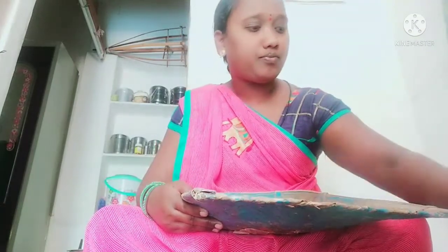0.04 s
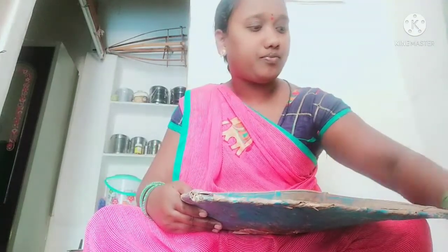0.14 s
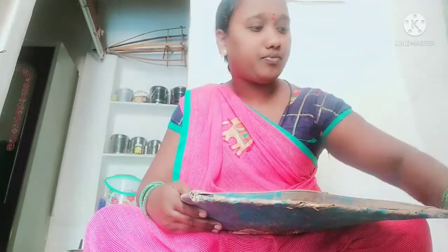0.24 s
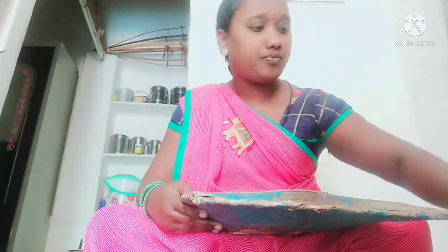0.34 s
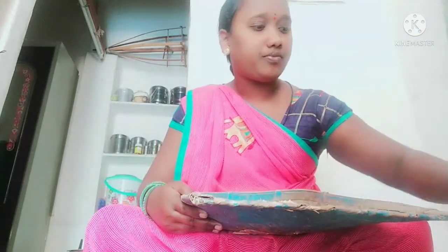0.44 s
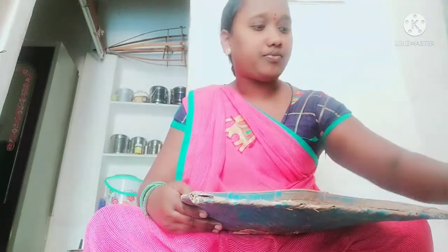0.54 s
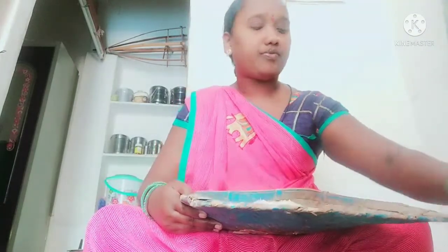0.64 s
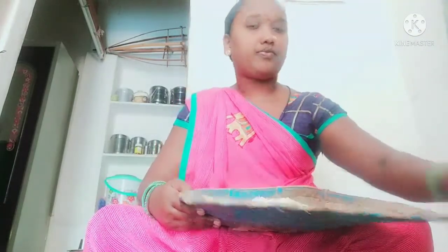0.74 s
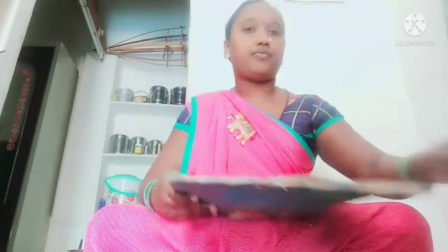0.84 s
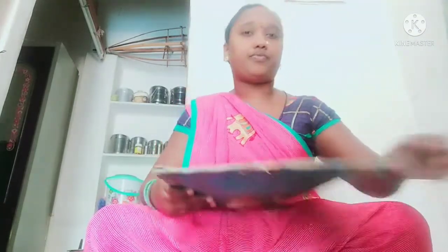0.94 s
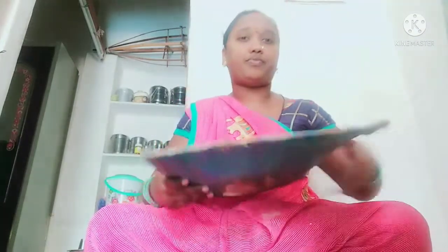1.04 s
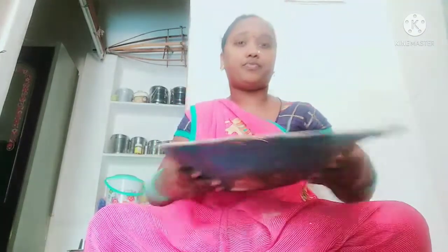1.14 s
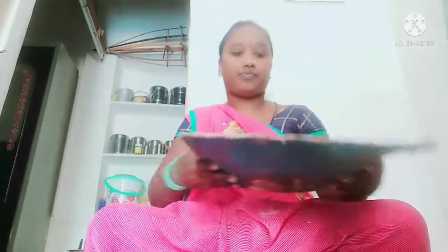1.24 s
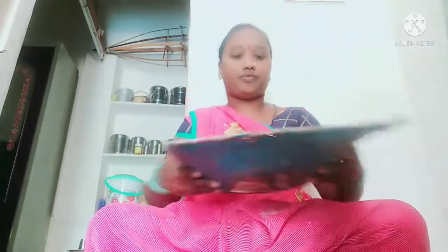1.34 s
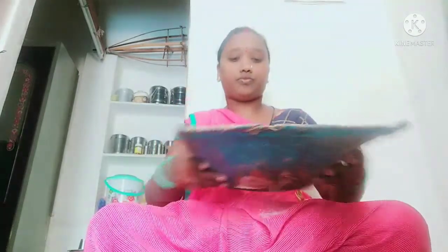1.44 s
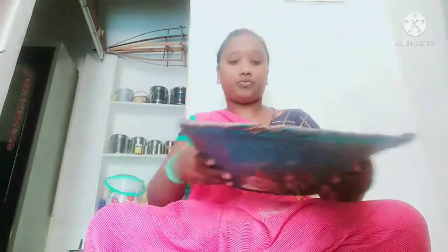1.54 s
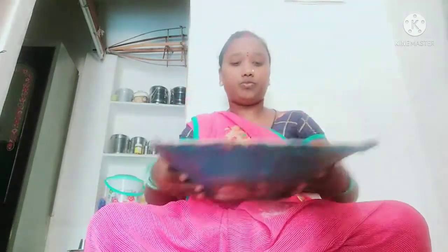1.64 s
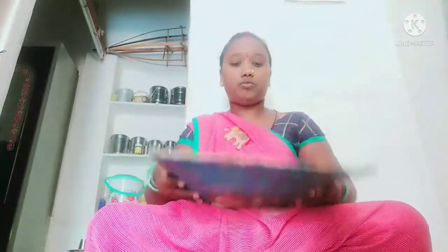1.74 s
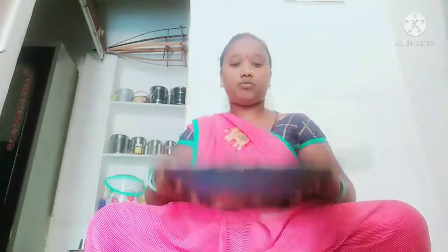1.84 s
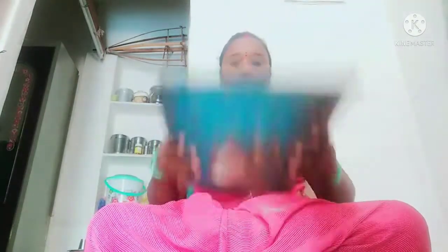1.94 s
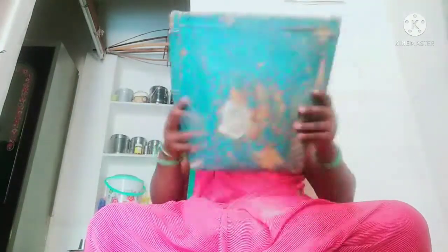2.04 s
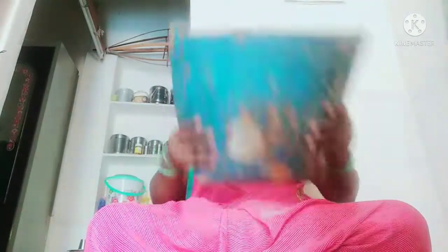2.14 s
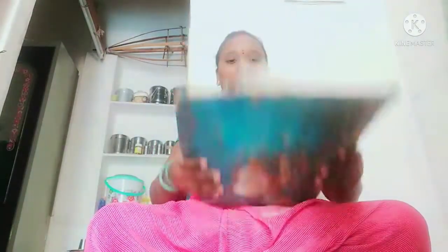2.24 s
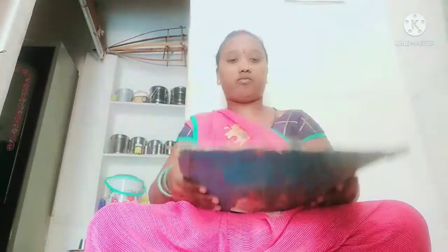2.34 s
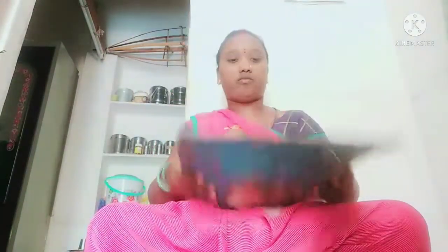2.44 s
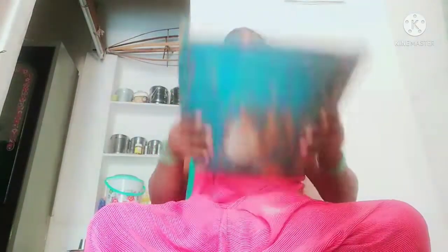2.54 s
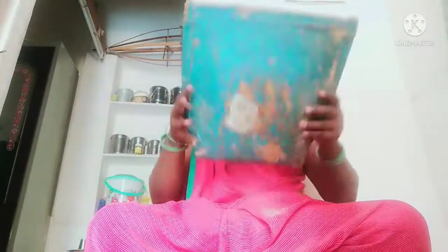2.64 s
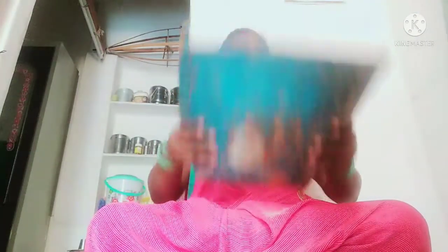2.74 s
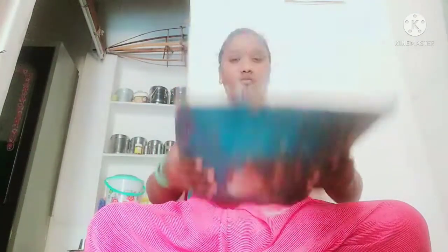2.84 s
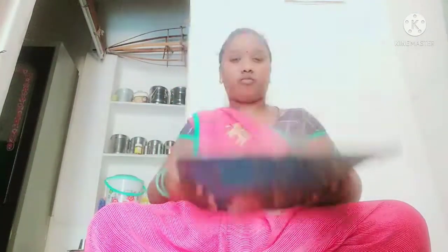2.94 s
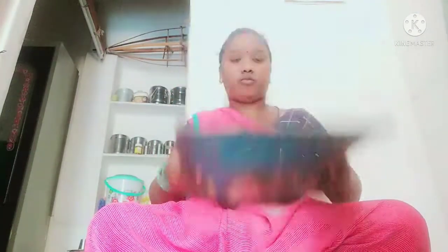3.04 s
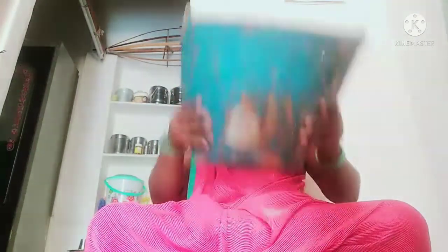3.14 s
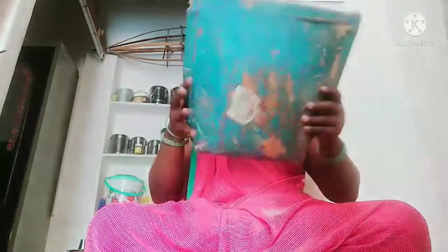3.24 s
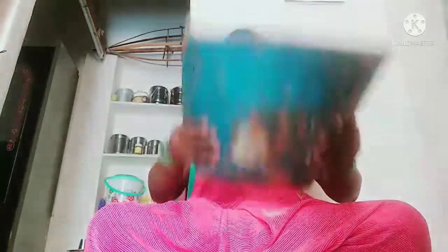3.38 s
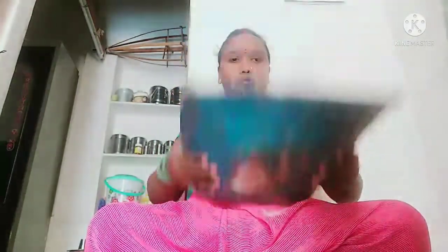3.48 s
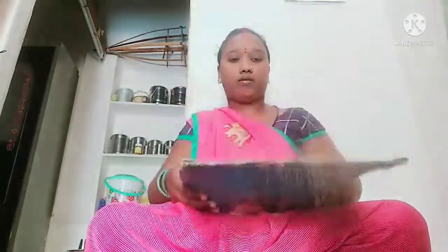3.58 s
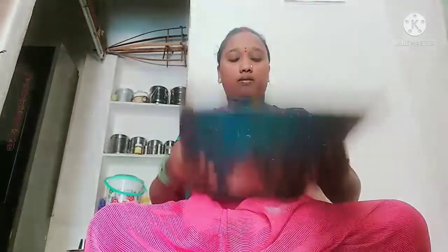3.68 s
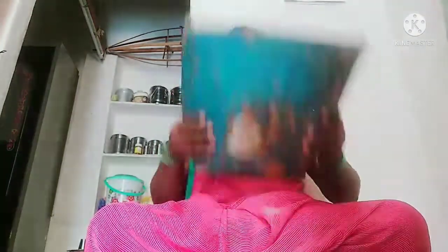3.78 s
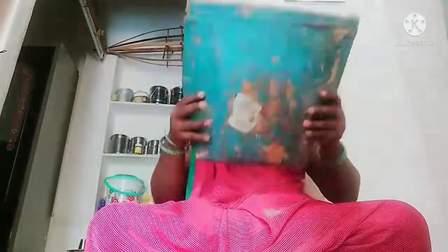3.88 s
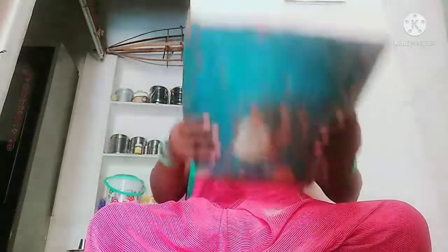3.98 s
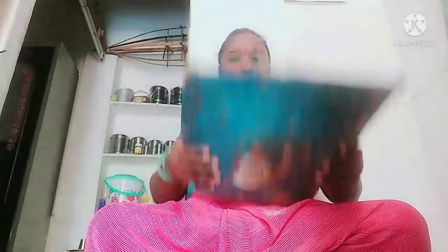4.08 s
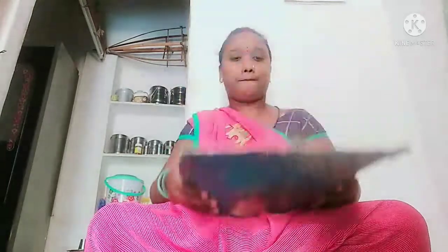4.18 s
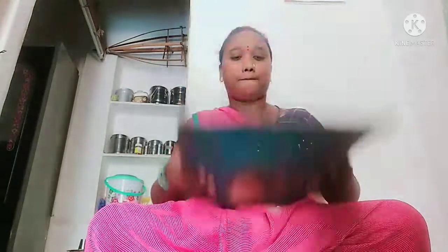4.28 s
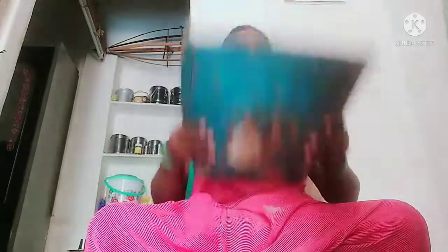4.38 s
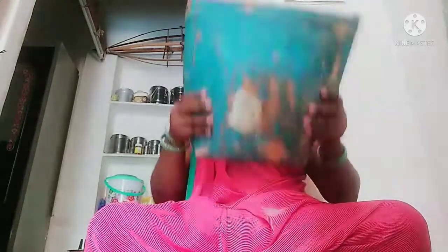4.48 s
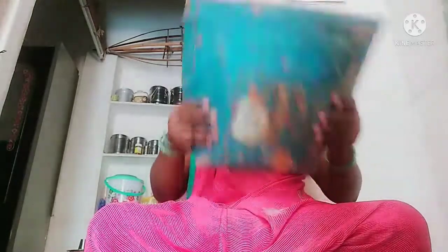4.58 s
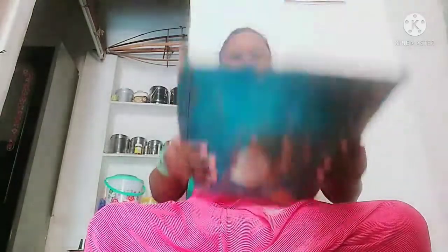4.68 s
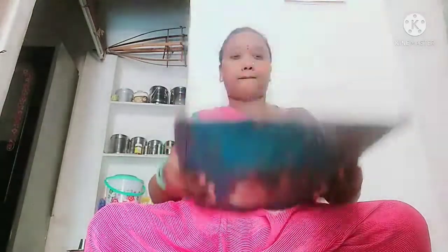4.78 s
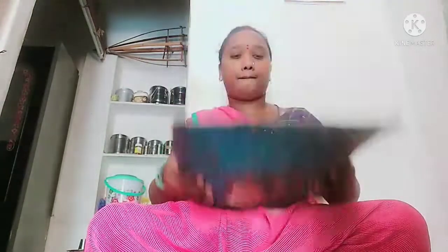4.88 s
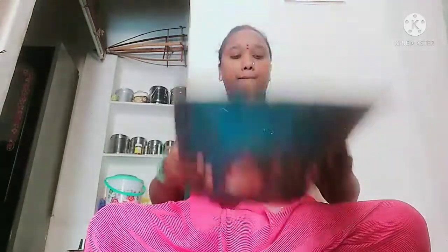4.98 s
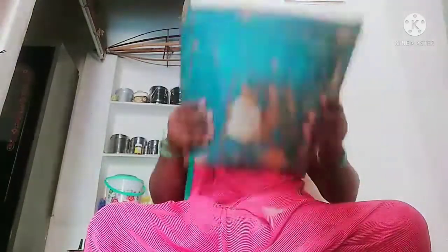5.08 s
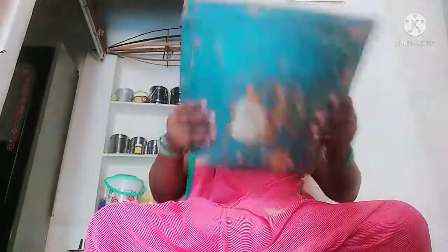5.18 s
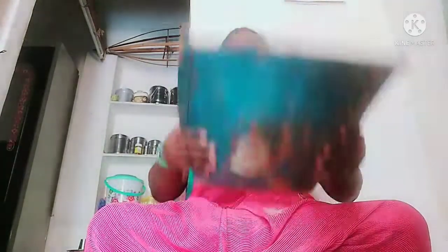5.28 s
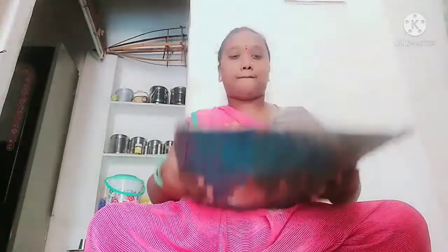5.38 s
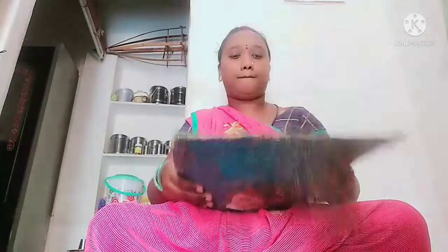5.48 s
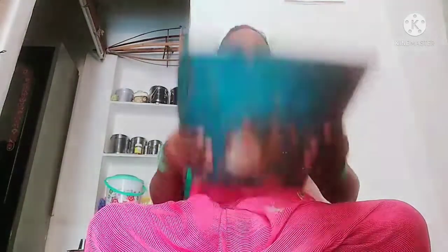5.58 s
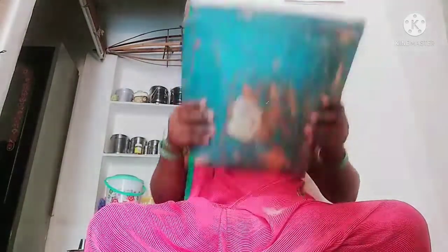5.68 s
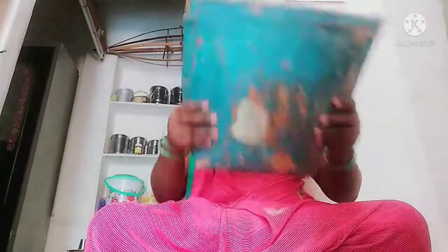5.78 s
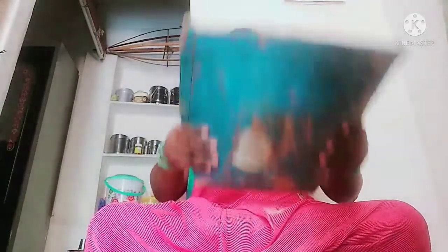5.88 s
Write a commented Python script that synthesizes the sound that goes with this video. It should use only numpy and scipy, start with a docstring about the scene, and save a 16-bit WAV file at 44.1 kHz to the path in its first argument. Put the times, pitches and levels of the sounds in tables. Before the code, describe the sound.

A handful of grain trickles into a steel pot, then a woven tray is shaken and tossed in a steady rhythm of swishing rustles.

```python
"""A handful of grain trickles into a steel pot, then a woven tray is shaken and tossed in rhythm, indoors.
Pot and tray are resonances struck by random grain impacts; grain-on-grain hiss is a bank of pitched clicks.
Fingers drum the tray's underside, single grains and strands snap, soft knocks and rustles are enveloped tones
and noise, glass bangles clink as blurred sines. Beneath lie noise-made room tone, traffic drone and fanned air,
and a far gliding hum. Decaying noise is the room; a microphone's sound port colours it all."""
import sys
import numpy as np
from scipy import signal
from scipy.fft import rfft, irfft, next_fast_len
from scipy.io import wavfile
from scipy.ndimage import map_coordinates

SR = 44100
rng = np.random.default_rng(int(sys.argv[2]) if len(sys.argv) > 2 else 0)


def output_pcm(signal):
    """Save a mono or channel-first signal as 16-bit PCM at the path in sys.argv[1].

    Samples are clipped to [-1, 1] before scaling.
    """
    pcm = np.clip(np.atleast_2d(signal).T, -1, 1) * 32767
    wavfile.write(sys.argv[1], SR, np.round(pcm).astype(np.int16))


N = 261072  # samples

# the load is tossed and slides back; a sag tilts the body level across the hold:
# (full flow from t/s, to t/s, tray body level/dB, its sag/dB, grain hiss level/dB)
TOSSES = [(2.168, 2.351, -48.5, 2.5, -45), (2.782, 2.923, -48, -2.5, -43.5), (3.382, 3.531, -47, 1, -43),
          (3.998, 4.139, -48, -1, -44), (4.63, 4.743, -46.5, 0, -42.5), (5.246, 5.36, -48, 0, -43),
          (5.848, 5.983, -49.5, -0.5, -45.5)]
# short level shakes and faint shifts of the load, same columns
SHAKES = [(0.702, 0.787, -74, 0, -81), (1.07, 1.11, -59, 0.3, -60), (1.138, 1.15, -69, 0.24, -59),
          (1.212, 1.285, -52, 1.1, -53.5), (1.366, 1.43, -50.5, 0, -51), (1.49, 1.565, -51, 0.46, -52),
          (1.62, 1.675, -62, 1.2, -62.5), (3.102, 3.183, -77, 0, -74), (4.54, 4.55, -68, 0, -65),
          (5.796, 5.8, -87, 0, -74)]
# heavy clumps of grain that land together: (t/s, lift/dB)
CLUMPS = [(2.238, 5.5), (2.263, 3), (2.35, 4), (2.822, 3), (2.85, 5.5), (2.886, -0.5), (2.924, 4.5),
          (4.721, 1.5)]
# resonances of the woven tray: (f/Hz, width/Hz, level/dB)
TRAY_MODES = [(117.5, 15, 1.5), (163.4, 41, 5.5), (225.6, 39, 6), (277, 55, 2), (414.5, 38.7, 6.5),
              (490.4, 15, 4.5), (574, 138, 1), (829, 71, 8), (1113, 190, 2), (1458, 152, 3.5),
              (1910, 178, 1), (2280, 160, 1.5), (2530, 720, -5), (4380, 1160, -9.5)]
# spectral tilt of grain clicking on grain: (f/Hz, gain/dB)
HISS_TILT = [(1500, 11), (3500, -7), (6000, 6), (11000, -1.5), (16000, 6.5)]
# grain trickling into the pot: (t/s, level/dB)
POUR = [(0, -56.5), (.04, -64), (.1, -77), (.115, -56), (.19, -54.5), (.22, -50.5), (.39, -50.5),
        (.43, -59), (.47, -64.5), (.5, -74), (.6, -73.5)]
# resonances of the steel pot: (f/Hz, width/Hz, level/dB)
POT_MODES = [(394, 8.8, 2.5), (1077, 16, 4), (1640, 33, 9.5), (1874, 103, 6.5), (2440, 790, -2),
             (3600, 390, -0.5), (4120, 590, -1.5), (6230, 1900, -4), (16400, 2900, -5.5)]
# fingers on the tray: (t/s, push level/dB ahead of the tray, contact time/ms)
FINGERS = [(2.0355, -24, 1.44), (2.0468, -24, 1.05), (2.0488, -23, 0.61), (2.0644, -20.5, 0.8),
           (2.6753, -21.5, 1.3), (2.682, -17, 0.81), (2.6872, -34, 0.86), (2.691, -24, 0.88),
           (2.715, -40, 0.82), (3.284, -21, 0.98), (3.288, -32, 0.23), (3.863, -34.5, 1.32),
           (3.876, -34, 1.2)]
# single grains and strands that snap: (t/s, nominal level/dB, thin below f/Hz, rebounds t60/ms)
TICKS = [(0.048, -44, 1500, 30), (0.1108, -49, 2000, 60), (0.1412, -43, 3000, 20), (0.1492, -42, 1500, 20),
         (0.1956, -38, 2500, 30), (0.2116, -37, 3000, 40), (0.254, -40, 2000, 30), (0.3004, -39, 3000, 30),
         (0.3133, -35, 2500, 25), (0.338, -40, 3000, 20), (0.4391, -45, 4000, 30), (0.4537, -42, 1500, 30),
         (0.477, -48, 3000, 25), (0.5133, -50, 3000, 20), (0.5169, -45, 1800, 45), (0.7365, -53, 4000, 30),
         (0.9506, -47, 1000, 25), (0.9682, -52, 5000, 25), (1.8138, -56, 1000, 25), (3.09, -56, 6000, 25),
         (3.7366, -45, 3000, 10), (4.2227, -41, 4000, 10), (4.3695, -46, 2000, 8), (4.395, -58, 4000, 10),
         (4.4645, -49, 2000, 35), (4.753, -32, 4000, 15), (4.9255, -52, 1000, 15), (5.5328, -42, 1500, 8),
         (5.614, -54, 5000, 15), (5.69, -55, 5000, 15)]
# soft hollow knocks on the pot's side: (t/s, nominal level/dB, pitch f/Hz)
KNOCKS = [(.008, -55.5, 460), (0.054, -52.5, 480), (.086, -55, 480), (1.008, -58, 610), (1.046, -51, 510),
          (4.999, -65, 470)]
# cloth and weave rubbing, and a gust of air off the swinging tray at the microphone: (t/s, length/s, centre
# f/Hz, width/Hz, level/dB)
RUSTLES = [(1, 0.36, 574, 200, -65.5), (5.611, 0.19, 590, 1390, -59.5)]
# bangles touch: (t/s, which bangle, nominal level/dB, t60/s: short where the wrist damps it)
CLINKS = [(.055, 0, -66, 1.2), (1.02, 1, -68, .2), (1.132, 2, -64, .35), (1.645, 1, -66, .15),
          (1.687, 0, -63, .12), (1.724, 0, -70, .12), (1.752, 0, -71, .12), (3.13, 3, -70, .15),
          (3.254, 3, -68, .3)]
# four glass bangles, each a list of modes: (f/Hz, level/dB)
BANGLE_MODES = [
    [(2622, -5), (3060, 0), (3478, -2)],
    [(2830, 0), (3560, -3), (3900, -4)],
    [(7332, 0), (9000, -7), (11870, -9), (13200, -9)],
    [(3343, -4), (3671, -2), (4856, 0), (6358, -4)],
]
# decay of the room: (f/Hz, t60/s)
WALL_DECAY = [(100, 0.85), (1000, 0.41), (8000, 0.28), (16000, 0.24)]
# spectrum of the room tone: (f/Hz, gain/dB)
ROOM_TONE = [(60, -54), (130, -2), (320, -14.5), (430, -9.5), (700, -15), (1900, -20), (4500, -29.5),
             (16000, -30)]
# traffic drone: (t/s, level/dB)
DRONE = [(0, -72), (.08, -64), (.62, -68), (.8, -74), (1.02, -62), (1.25, -60.5), (1.4, -68.5), (1.76, -69),
         (1.99, -60.5), (2.54, -72), (3.03, -59.5), (3.3, -67.5), (3.9, -59.5), (4.7, -64), (5.0, -64.5),
         (5.26, -55), (5.45, -57), (5.92, -63)]
# puffs of air fanned at the microphone: (t/s, length/s, level/dB, thud relative to the puff/dB)
PUFFS = [(.62, 0.088, -80, -20), (0.876, 0.071, -69, -20), (2.728, 0.068, -67, -14),
         (3.499, 0.058, -45.5, -4.5), (3.9, 0.26, -69, -7), (4.146, 0.055, -53, -9), (4.47, 0.089, -64, 2),
         (4.87, 0.054, -53.5, -6), (5.663, 0.094, -53.5, -2), (5.9, 0.15, -54.5, -1.5)]
# resonances of the microphone's sound port: (f/Hz, width/Hz, lift/dB)
PORT = [(7020, 830, 10), (14960, 760, 7.5)]

# flow at brisk = 1: it builds up fastest at first, then stops; the corners are rounded
RISE_DB_PER_S, RISE_BEND_DB_PER_S2, FALL_DB_PER_S, CORNER_S = 191, 497, 300, 0.012
STRAGGLE_DB, STRAGGLE_HISS_DB, STRAGGLE_DB_PER_S = -24.5, -54.5, 54  # late grains roll on under the flow
BRIGHTEN_DB_PER_S = 26  # at full flow the hiss grows
CLUMP_DB, CLUMPS_PER_S, CLUMP_S = 1.2, 35, .005  # unevenness of the flow; spread of a heavy clump
SHIFT_DB, SHIFTS_PER_S = 1.8, 50  # as the load moves, each mode and grain pitch swells on its own
SHAKE_BRISK = 1.7  # shakes start and stop faster than tosses
SHAKE_DEEP_DB, DEEP_HZ = -3, 700  # and move the deep modes less
ROOM_TONE_DB = -69.5  # mean level, before a slow wobble
AIR_DB, AIR_GROWS_DB_PER_S = -79.5, 2.5  # stirring between the puffs, before its treble cut
THUD_HZ = 85.7
HUM_S, HUM_LENGTH_S, HUM_FROM_HZ, HUM_TO_HZ, HUM_DB = 4.64, .48, 220, 280, -71  # a faint far hum glides up
TOP_HZ = 15620  # band limit


def winnowing():
    """Each grain knocks the tray and clicks against its neighbours at a pitch of its own."""
    toss_body, toss_hiss = flow(TOSSES, brisk=1)
    shake_body, shake_hiss = flow(SHAKES, brisk=SHAKE_BRISK)
    hits = patter(12000, spread_db=2.5, clump_db=0.5, clump_rate=64)

    def shifting():
        return hits * amp(SHIFT_DB * wobble(SHIFTS_PER_S))

    def hard(hz):  # small grains barely move the low modes
        return (1j * hz / (330 + 1j * hz)) ** 3

    body = 0
    for k, (hz, width_hz, db) in enumerate(TRAY_MODES):
        body = body + (-1) ** k * amp(db) * resonance(shifting(), hz, width_hz)
    body = levelled(filtered(body, hard), 700, 3000)

    pitches = np.geomspace(2500, 17000, num=14)
    kind = rng.integers(len(pitches), size=N)  # which pitch each grain clicks at
    clicks = sum(resonance(shifting() * (kind == k), hz, hz / 6) for k, hz in enumerate(pitches))
    hiss = levelled(filtered(clicks, lambda hz: amp(along(HISS_TILT, hz))), 5000, 15500)

    deep = filtered(body, lambda hz: 1 / (1 + (hz / DEEP_HZ) ** 8))
    shaken = body + (amp(SHAKE_DEEP_DB) - 1) * deep
    t = np.arange(N) / SR
    heavy_db = sum(db * np.exp(-.5 * ((t - s) / CLUMP_S) ** 2) for s, db in CLUMPS)
    lumps = amp(CLUMP_DB * wobble(CLUMPS_PER_S) + heavy_db)
    return lumps * (toss_body * body + shake_body * shaken + (toss_hiss + shake_hiss) * hiss)


def flow(moves, brisk):
    """Gain of tray body and hiss: every move rises, holds, stops and leaves stragglers."""
    t, body, hiss = np.arange(N) / SR, 0, 0

    def past(s):  # time beyond a rounded corner
        return CORNER_S * np.logaddexp(0, s / CORNER_S)

    for start, end, body_db, sag_db, hiss_db in moves:
        before, after, hold = brisk * past(start - t), past(t - end), end - start
        rise_db = RISE_DB_PER_S * before + RISE_BEND_DB_PER_S2 * before ** 2
        held = np.clip(t - end + hold / 2, -hold / 2, hold / 2)  # time from mid-hold
        slide = amp(-FALL_DB_PER_S * brisk * after)
        late = amp(-STRAGGLE_DB_PER_S * after)
        body_gain = amp(body_db - rise_db - sag_db * held / hold)
        hiss_gain = amp(hiss_db - rise_db + BRIGHTEN_DB_PER_S * held)
        body = body + body_gain * (slide + amp(STRAGGLE_DB) * late)
        hiss = hiss + hiss_gain * (slide + amp(STRAGGLE_HISS_DB) * late)
    return body, hiss


def patter(per_second, spread_db, clump_db, clump_rate):
    """Impacts of many grains: random instants, a few much larger than the rest, arriving in clumps."""
    draw = rng.random((3, N))
    lands = draw[0] < per_second / SR
    sign = np.sign(draw[1] - .5)
    size = amp(-spread_db * np.log(draw[2] + .004))
    return lands * sign * size * amp(clump_db * wobble(clump_rate))


def pouring():
    """Fewer, spikier impacts; the steel pot rings on after each."""
    hits = patter(6000, spread_db=3, clump_db=1.4, clump_rate=110)

    def steel(hz):
        return modes(POT_MODES)(hz) * (1j * hz / (300 + 1j * hz))

    steady = filtered(hits, steel)
    scale = np.std(levelled(steady, 1300, 15500)) / np.std(steady)  # set by the unfaded patter
    return scale * filtered(amp(curves(POUR)[0]) * hits, steel)


def fingers():
    """A soft push on the tray, with a rattle of the grains that it shakes loose."""
    push, rattle, t = np.zeros(N + SR), np.zeros(N + SR), np.arange(SR // 10) / SR
    for s, db, ms in FINGERS:
        at = round(s * SR)
        contact = np.clip(t / (ms / 1000), 0, 1)
        push[at:][:len(t)] -= amp(db) * np.sin(np.pi * contact) ** 2
        rattle[at:][:len(t)] += amp(db - 60 * t / 0.089) * rng.standard_normal(len(t))

    def thumped(hz):
        broad = 1 + 380 / (120 + 1j * hz)  # a wide fingertip favours the low modes
        direct = amp(-11.5) * 1j * hz / (90 + 1j * hz)
        return amp(-8.0) * modes(TRAY_MODES)(hz) * broad + direct

    def rattled(hz):
        return amp(-34.5) + amp(-22.0) * modes([(900, 1500, 0)])(hz)

    return filtered(push[:N], thumped) + filtered(rattle[:N], rattled)


def ticks():
    """A hard click, then noisy rebounds that die within milliseconds."""
    out, t = np.zeros(N + SR), np.arange(SR // 20) / SR
    for s, db, thin_hz, ms in TICKS:
        snap = amp(db - 9 - 60 * t / (ms / 1000)) * rng.standard_normal(len(t))
        snap[:2] += amp(db - 5)
        thin = signal.butter(2, thin_hz, "high", fs=SR, output="sos")
        out[round(s * SR):][:len(t)] += signal.sosfilt(thin, snap)
    return filtered(out[:N], lambda hz: 1.3 / (1 + 1j * hz / 8000))  # a grain is not quite hard


def knocks():
    """One hollow mode, softly struck."""
    out, t = np.zeros(N + SR), np.arange(SR // 10) / SR
    for s, db, hz in KNOCKS:
        level = amp(db - 60 * t / 0.039) * (1 - np.exp(-t / 0.00075))
        out[round(s * SR):][:len(t)] += level * np.sin(2 * np.pi * hz * t)
    return out[:N]


def rustles():
    """Noise swelling and fading in one broad band."""
    out, t = np.zeros(N), np.arange(N) / SR
    for s, length, hz, width_hz, db in RUSTLES:
        band = modes([(hz, width_hz, 0)])
        rub = filtered(rng.standard_normal(N), lambda f: band(f) / (1 + (f / 2000) ** 2))
        swell = np.sin(np.pi * np.clip((t - s) / length, 0, 1) ** 0.49)
        out += amp(db) * swell * rub / rub.std()
    return out


def bangles():
    """Glass rings rub and sing briefly; each tone is a blur of several close ones."""
    out, t = np.zeros(N + SR), np.arange(SR // 2) / SR
    for s, which, db, t60 in CLINKS:
        for hz, mode_db in BANGLE_MODES[which]:
            ring = 0
            for _ in range(3):
                ring = ring + .8 * np.sin(2 * np.pi * ((hz + rng.normal(0, 55)) * t + rng.random()))
            level = amp(db + mode_db + rng.normal(0, 2) - 60 * t / t60)
            onset = 1 - np.exp(-t / .008)
            out[round(s * SR):][:len(t)] += level * onset * ring / abs(port(hz))  # offsets the port's lift
    return out[:N]


def walls(x):
    """Each frequency of the room's answer dies at its own speed."""
    hz, t, z = signal.stft(rng.standard_normal(SR // 2), SR, nperseg=256)
    fade = amp(-60 * t / along(WALL_DECAY, hz)[:, None])
    tail = signal.istft(z * fade, SR, nperseg=256)[1]
    late = np.pad(x, (250, 0))  # samples of pre-delay
    return signal.fftconvolve(late, tail / np.linalg.norm(tail))[:N]


def background():
    """Room tone, traffic drone and fanned air are filtered noise; the far hum is a gliding sine."""
    t = np.arange(N) / SR
    white = rng.standard_normal((4, N))
    room = levelled(filtered(white[0], lambda hz: amp(along(ROOM_TONE, hz))), 75, 10000)
    room = amp(ROOM_TONE_DB + wobble(3.03)) * room

    drone = levelled(filtered(white[2], lambda hz: modes([(68, 45, 0)])(hz) ** 3), 35, 150)
    drone = amp(curves(DRONE)[0]) * drone

    fan_gain, thud_gain = amp(AIR_DB + AIR_GROWS_DB_PER_S * t), 0
    for s, length, db, thud_db in PUFFS:
        puff = amp(db) * np.exp(-2 * ((t - s) / length) ** 2)
        fan_gain = fan_gain + puff
        thud_gain = thud_gain + puff * amp(thud_db)
    air = levelled(filtered(white[1], modes([(35, 25, 0)])), 20, 50)
    air = filtered(air, lambda hz: 1 / np.sqrt(1 + (hz / 70) ** 6))  # puffs of air hold no treble
    thud = levelled(filtered(white[3], lambda hz: modes([(THUD_HZ, THUD_HZ, 0)])(hz) ** 3), 35, 250)

    u = np.clip((t - HUM_S) / HUM_LENGTH_S, 0, 1)
    glide_hz = HUM_FROM_HZ + (HUM_TO_HZ - HUM_FROM_HZ) * np.sin(np.pi * u / 2)
    swell = np.sqrt(np.abs(np.sin(np.pi * u)))
    hum = amp(HUM_DB + wobble(30.5)) * swell * np.sin(2 * np.pi * np.cumsum(glide_hz) / SR)
    return room + fan_gain * air + drone + thud_gain * thud + hum


def port(hz):
    """The microphone is flat apart from the lift of its sound port."""
    return 1 + sum((amp(db) - 1) * 1j * hz * w / (c * c - hz * hz + 1j * hz * w) for c, w, db in PORT)


def resonance(x, hz, width_hz):
    """x through one resonance."""
    b, a = signal.iirpeak(hz, hz / width_hz, SR)
    return signal.lfilter(b, a, x)


def modes(table):
    """Causal response of a set of resonances, alternating in sign."""
    def response(f):
        total = 0
        for k, (c, w, db) in enumerate(table):
            total = total + (-1) ** k * amp(db) * 1j * f * w / (c * c - f * f + 1j * f * w)
        return total
    return response


def filtered(x, response):
    """x shaped by a complex response of frequency."""
    m = next_fast_len(N + SR)
    return irfft(rfft(x, m) * response(np.fft.rfftfreq(m, 1 / SR)), m)[..., :N]


def levelled(x, lo_hz, hi_hz):
    """x scaled so that the microphone reads rms 1 in a band."""
    band = filtered(x, lambda hz: port(hz) * (hz > lo_hz) * (hz < hi_hz))
    return x / np.sqrt(np.mean(band ** 2))


def wobble(rate):
    """A smooth random curve, rate knots a second."""
    knots = rng.standard_normal(int(N * rate / SR) + 4)
    return map_coordinates(knots, [np.arange(N) * rate / SR])


def curves(rows):
    """One value per sample for each column after the time; -120 outside."""
    s, *cols = np.transpose(rows)
    return [np.interp(np.arange(N) / SR, s, c, left=-120, right=-120) for c in cols]


def along(points, hz):
    """(f/Hz, value) points joined on a log frequency axis."""
    f, v = np.transpose(points)
    return np.interp(np.log(hz + 1), np.log(f + 1), v)


def amp(db):
    """Decibels to gain."""
    return 10 ** (np.asarray(db) / 20)


def scene():
    """Near sounds, their room, and the background."""
    near = winnowing() + pouring() + fingers() + ticks() + knocks() + rustles() + bangles()
    return (near + amp(-10.5) * walls(near) + background())[None]


def record(dry):
    """The port colours the sound; nothing is kept above the band limit."""
    return filtered(dry, lambda hz: port(hz) * (hz < TOP_HZ))


dry = scene()
out = record(dry)
output_pcm(out)
```